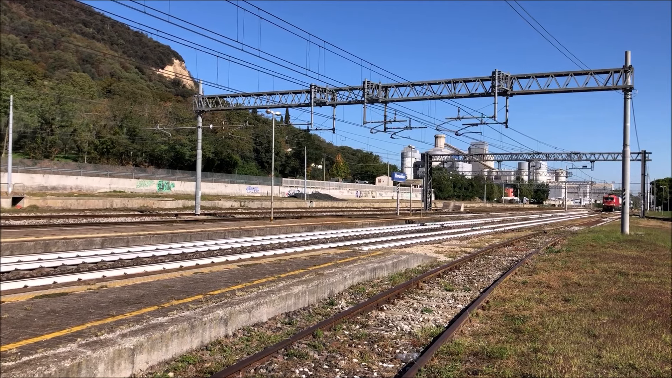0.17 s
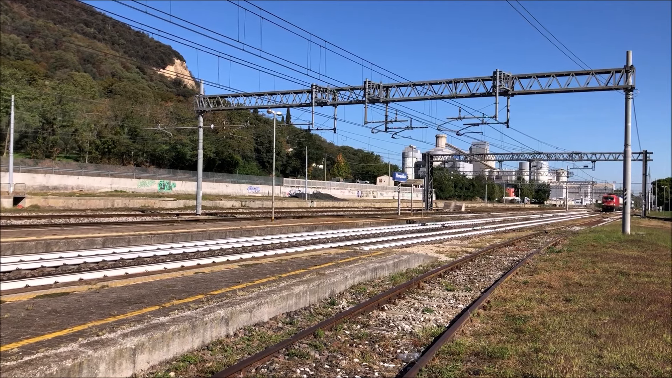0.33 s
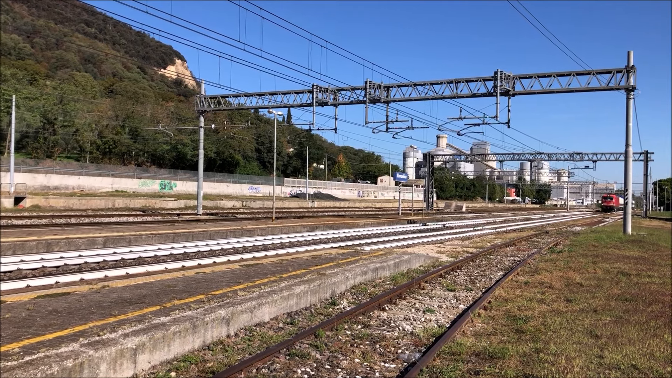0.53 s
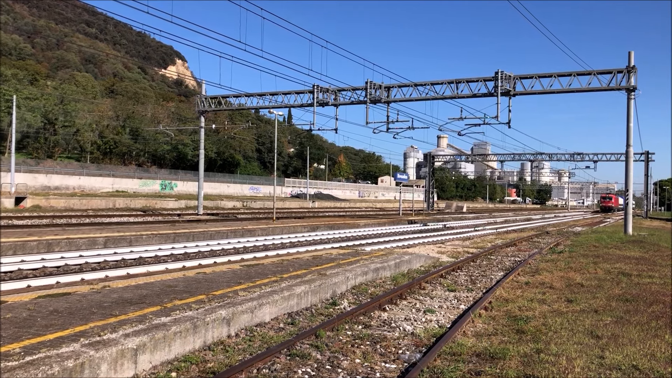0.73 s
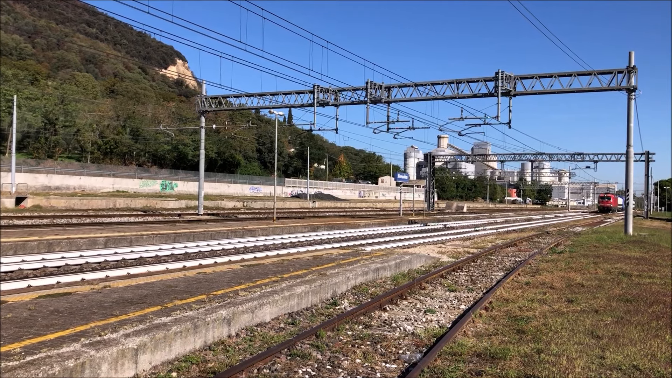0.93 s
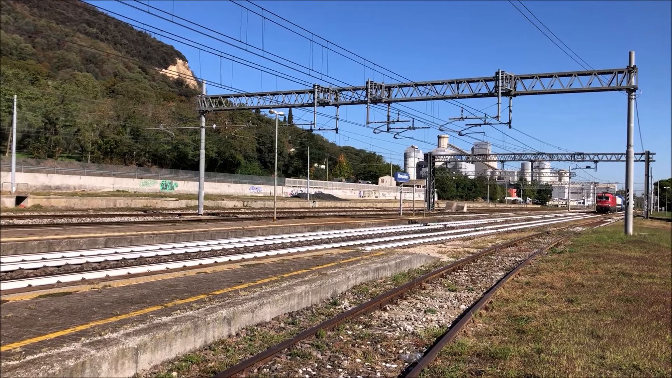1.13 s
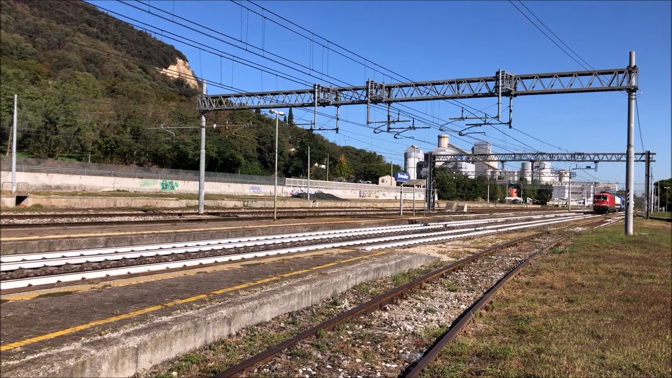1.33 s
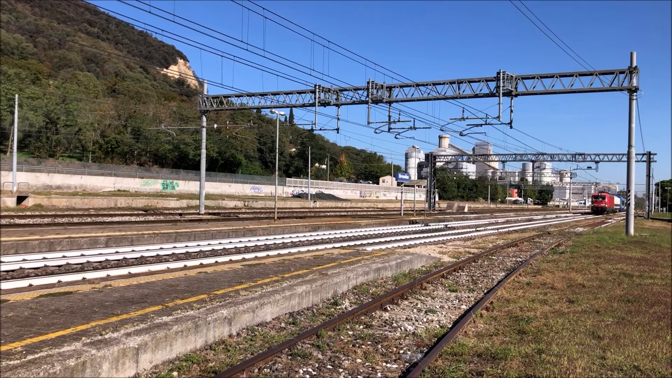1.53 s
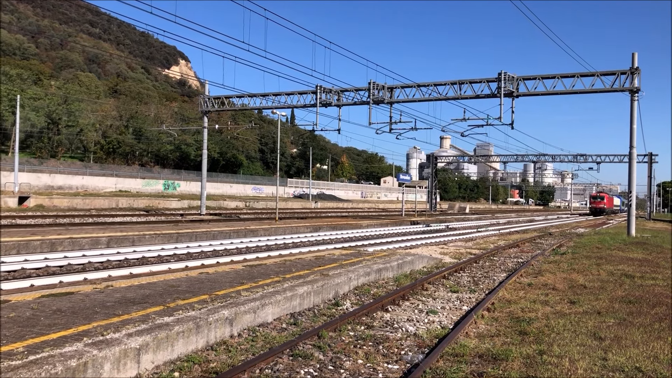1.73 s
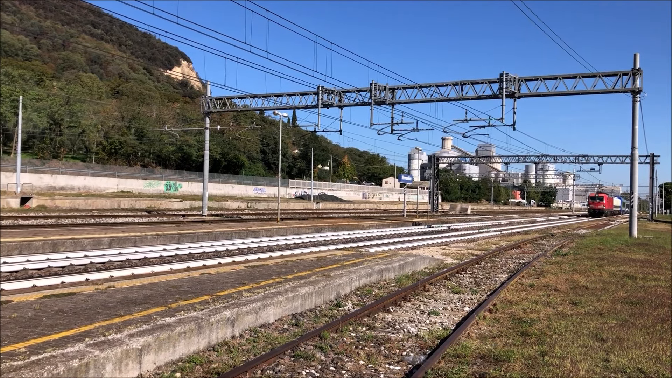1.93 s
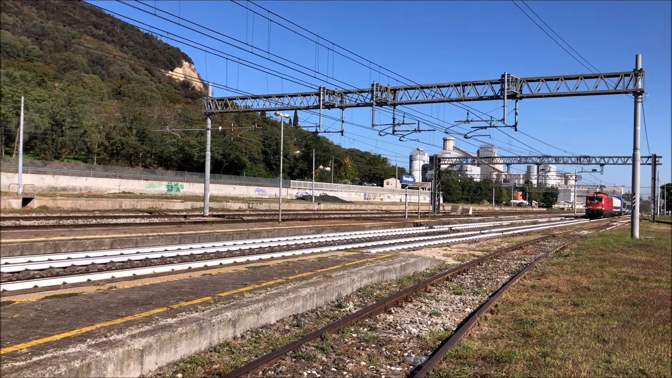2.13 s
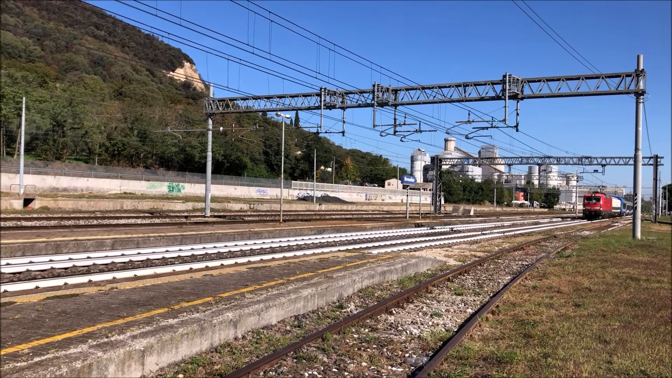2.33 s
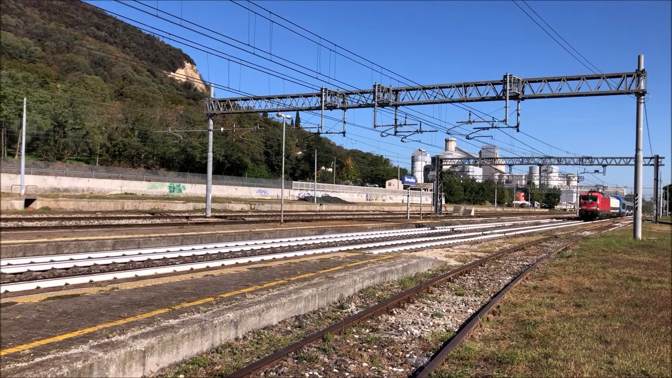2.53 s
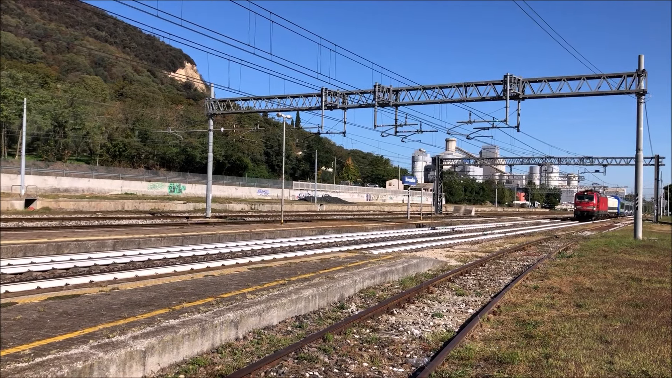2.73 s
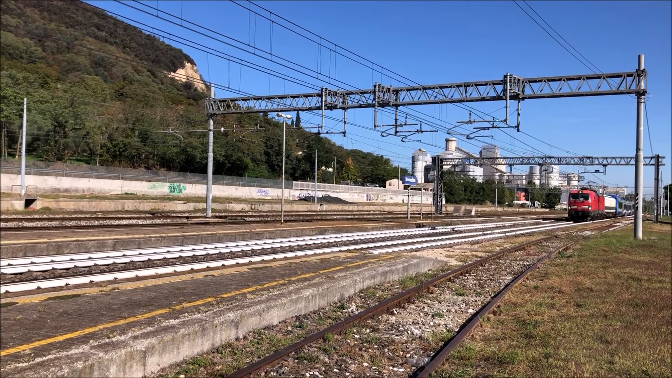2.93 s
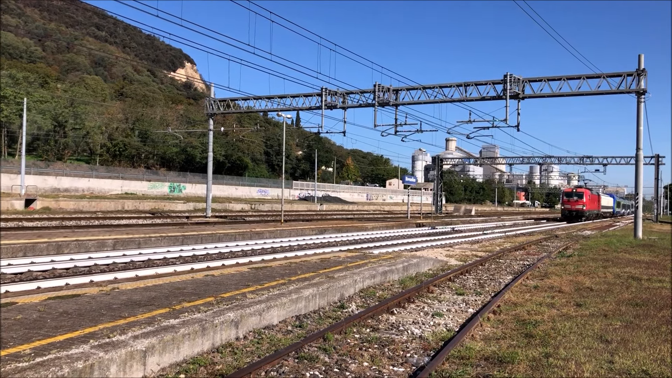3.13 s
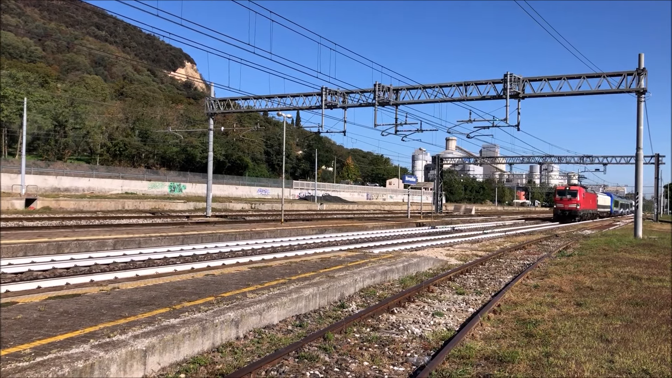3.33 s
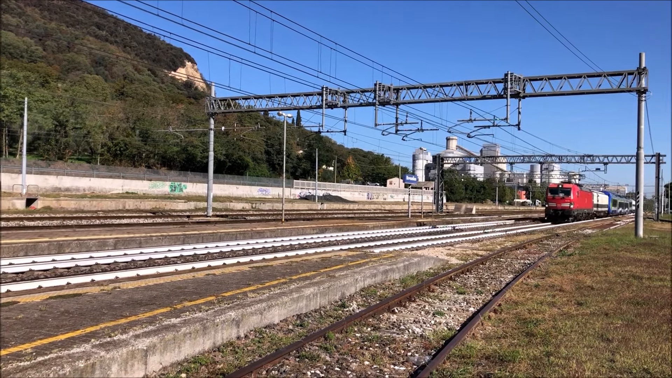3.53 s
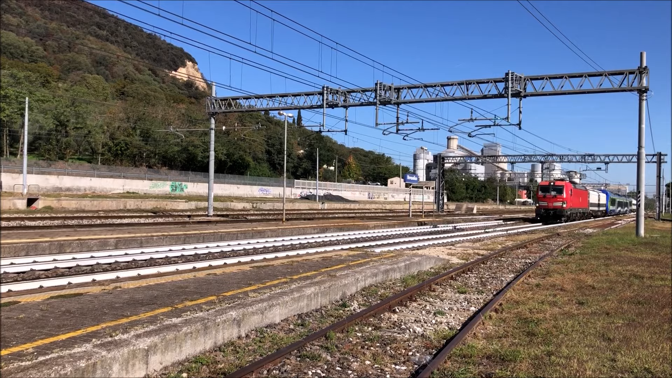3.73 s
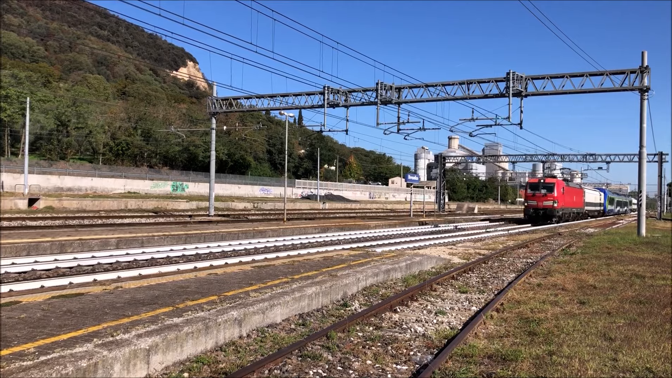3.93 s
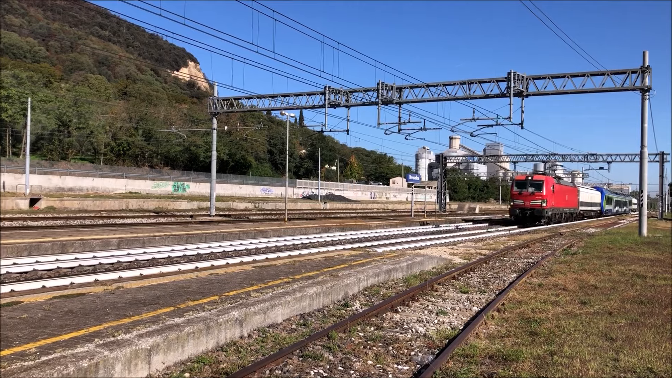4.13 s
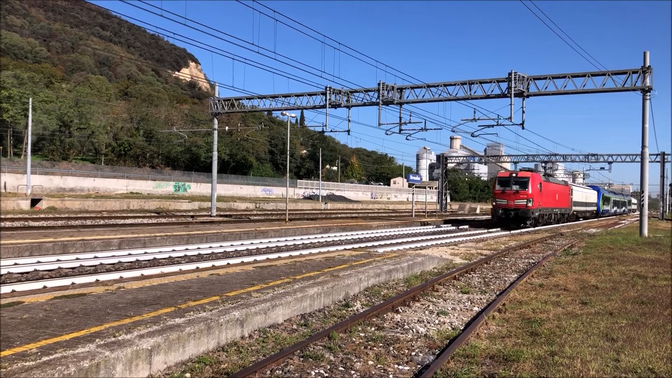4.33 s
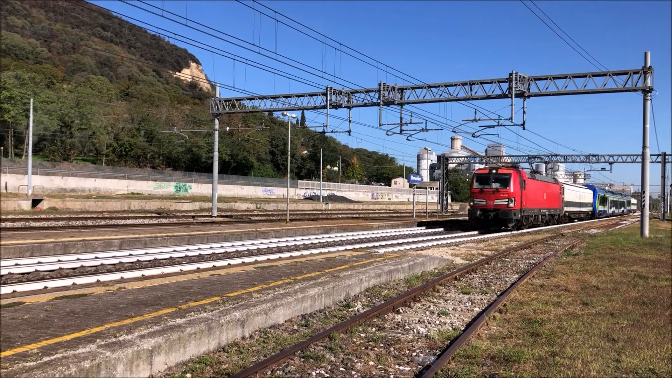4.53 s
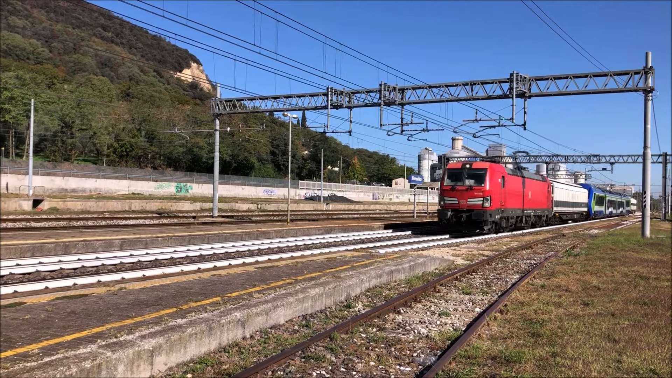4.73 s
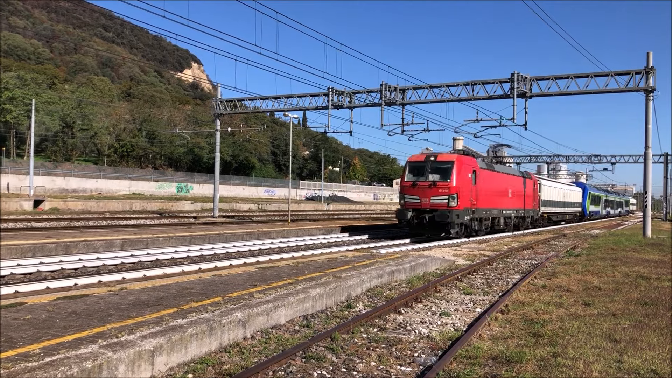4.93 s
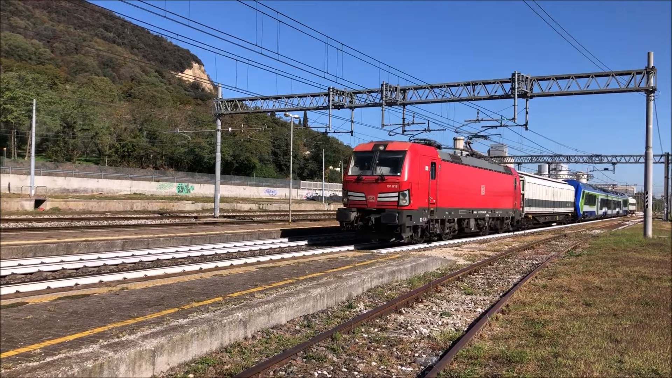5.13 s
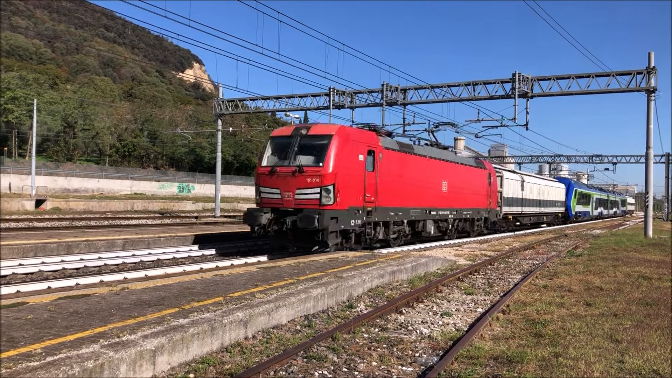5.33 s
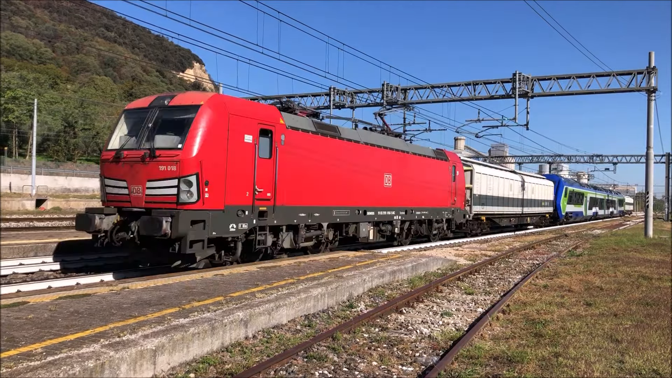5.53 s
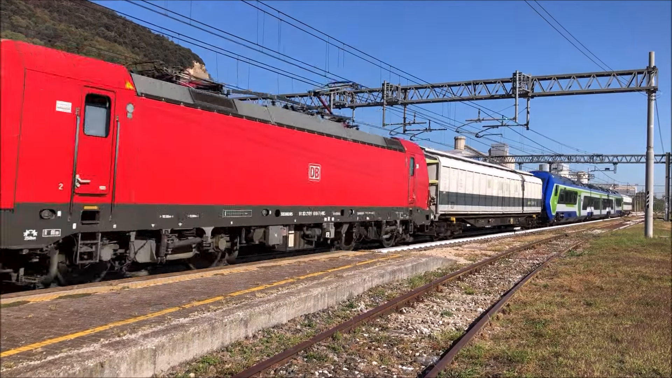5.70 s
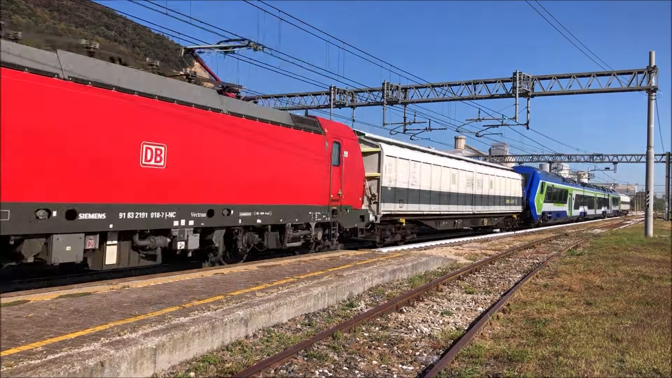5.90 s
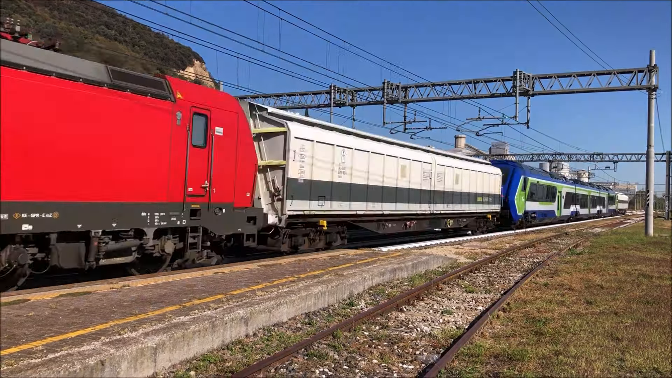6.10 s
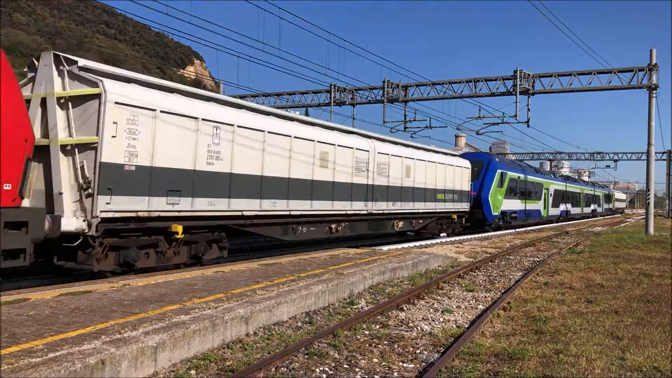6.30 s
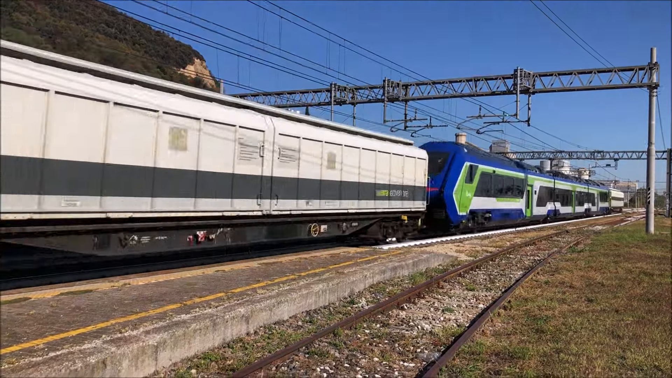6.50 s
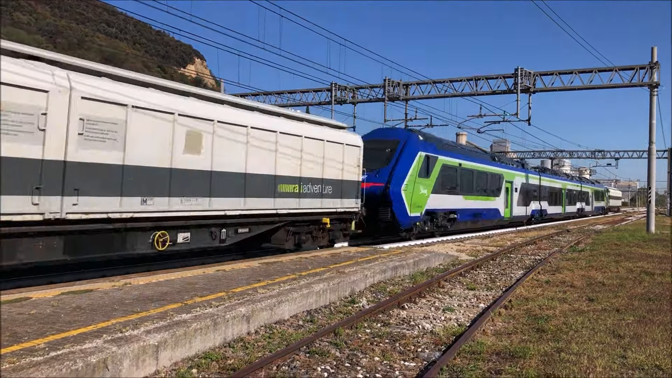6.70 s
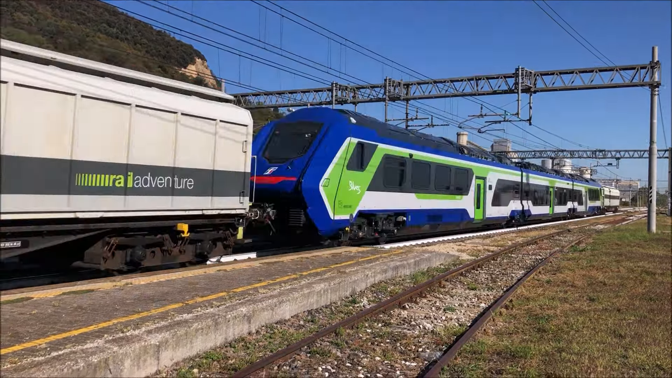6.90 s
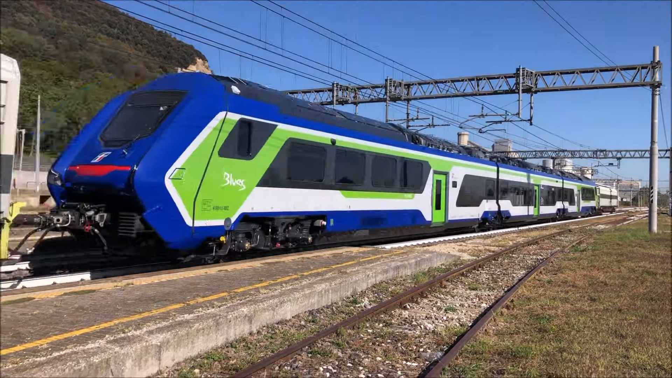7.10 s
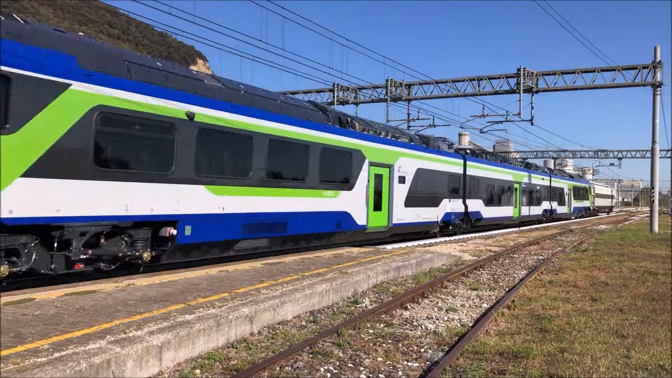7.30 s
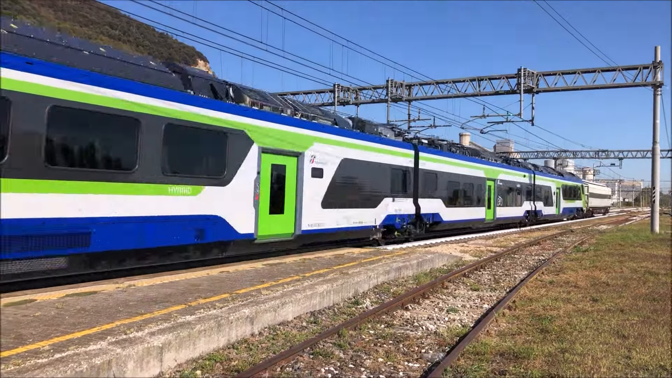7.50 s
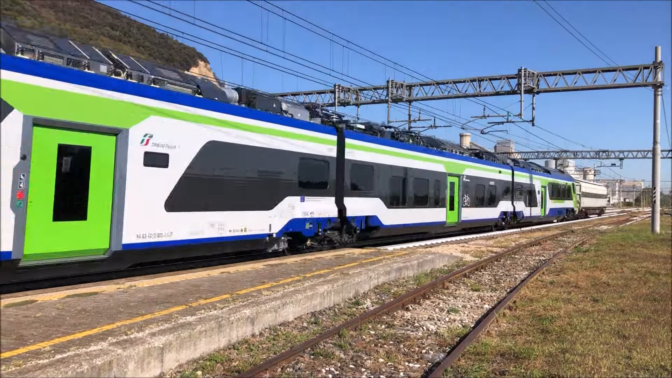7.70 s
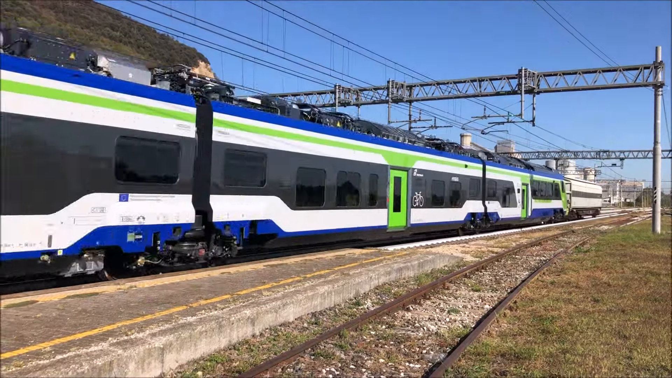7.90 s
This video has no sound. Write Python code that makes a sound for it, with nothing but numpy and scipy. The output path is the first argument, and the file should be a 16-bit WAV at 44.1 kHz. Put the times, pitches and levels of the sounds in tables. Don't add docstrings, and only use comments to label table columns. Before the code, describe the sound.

An open station yard, heard from a phone beside the track. From 0 to 2.7 seconds it is quiet: soft low wind thumps, busiest between 0.9 and 1.9, a faint low hum, a thin high tone and distant rolling noise slowly rising. At 2.7 a short, loud air-horn toot breaks in, then a longer one from 3.0 to 3.4 with two quick raspy wavers, and short toots at 3.6, 4.15, 4.5 and 5.0. All hold one mid-high pitch, sagging slightly as they stop, with slightly lower echoes from walls and hillside and a diffuse tail. From about 4.6 the wheel noise swells and brightens, becoming a close roar near 5.9. Thin falling whines and hissing clanks follow through 6.6. Rail tones drop in pitch, wheel rumble pulses, and sharp metallic clacks cluster around 7.4 to 7.5, with more near 7.7 as the train continues passing to the end.

```python
import sys
import numpy as np
from scipy import signal
from scipy.io import wavfile
from scipy.ndimage import uniform_filter1d, map_coordinates

SR = 44100
rng = np.random.default_rng(int(sys.argv[2]) if len(sys.argv) > 2 else 0)


def generate_wav(signal):
    frames = np.transpose(np.atleast_2d(signal))
    scaled = np.clip(frames, -1, 1) * 32767
    pcm = np.round(scaled).astype(np.int16)
    wavfile.write(sys.argv[1], SR, pcm)


def to_linear_factor(level_db):
    exponent = np.asarray(level_db, float) / 20
    return 10 ** exponent


N = 350595
T = np.arange(N) / SR

# (time [s], peak [dB], pitch [Hz])
WIND_THUMPS = [(0.009, -45, 68), (0.297, -45.5, 59), (0.469, -46.5, 70.0), (0.539, -48.5, 75.6),
               (0.895, -35, 66.2), (0.939, -43, 61.3), (1.017, -35, 81.4), (1.092, -27, 116.6),
               (1.155, -38.5, 94), (1.317, -33.5, 100), (1.359, -40.5, 79), (1.438, -40, 79),
               (1.509, -46, 59), (1.671, -37, 77.8), (1.819, -38, 80), (2.049, -48, 155), (2.317, -41, 72),
               (2.632, -36.5, 68.2), (3.124, -42, 75.4)]
# (time [s], change [dB], half length [s])
WIND_LULLS = [
    (0.149, -4.5, 0.116),
    (.6, -5.5, 0.23),
    (2.948, 3.5, 0.053),
    (4.702, -3.5, 0.234),
    (5.103, -6.5, 0.069),
    (5.548, 4, 0.102),
    (7.079, 4, 0.052),
]
# (start [s], end [s], start pitch [Hz], end pitch [Hz], level [dB])
HUMS = [
    (0, 2.2, 315.4, 318.3, -58),
    (1.65, 2.32, 2330, 2330, -54.5),
]
# (start [s], end [s], start pitch [Hz], end pitch [Hz],
# level [dB])
SIDE_TONES = [(2.82, 2.95, 1760, 1700, -46), (3.02, 3.07, 1690, 1745, -29), (3.09, 3.16, 1680, 1620, -32),
              (3.12, 3.33, 2966, 2966, -29), (3.14, 3.43, 1462, 1466, -18.5), (3.14, 3.42, 2175, 2196, -33),
              (3.14, 3.42, 2930, 2935, -32), (4.24, 4.42, 1790, 1690, -45), (4.55, 4.7, 1754, 1700, -45),
              (5.2, 5.326, 1760, 1710, -46), (3.752, 3.83, 1485, 1455, -23),
              (6.585, 6.635, 8350, 8330, -50), (6.585, 6.63, 13800, 13780, -50),
              (6.385, 6.42, 6000, 5990, -50), (6.19, 6.24, 5430, 5420, -48), (6.15, 6.24, 6330, 6320, -49),
              (2.225, 2.26, 6850, 6850, -66), (7.325, 7.36, 5000, 4990, -47), (7.41, 7.44, 2330, 2330, -33),
              (7.42, 7.445, 950, 950, -33), (7.33, 7.36, 2400, 2350, -38), (7.41, 7.44, 2635, 2630, -31),
              (7.475, 7.51, 5500, 5480, -41), (7.405, 7.44, 3600, 3580, -35), (7.465, 7.5, 3090, 3090, -31),
              (7.47, 7.5, 1823, 1830, -33)]
HUM_WANDER_HZ, SIDE_TONE_WANDER_HZ = 7.7, 3.74

# (time [s], centre [Hz], width [Hz], length [s],
# level [dB])
CLANKS = [(5.846, 6790, 7440, 0.605, -31.5), (5.85, 7100, 4500, 0.024, -39),
          (6.23, 7200, 2500, 0.023, -32.5), (6.634, 6050, 3100, 0.0088, -30), (7.236, 6300, 2500, .01, -38),
          (7.386, 3000, 4000, 0.0017, -35.5), (7.442, 2500, 4000, 0.0015, -25.5),
          (7.472, 3500, 5000, 0.0013, -23.5), (7.478, 2500, 4000, 0.0021, -21.5),
          (7.707, 2500, 4000, 0.0011, -29.5), (6.323, 1500, 2400, 0.00082, -15),
          (6.537, 2500, 4000, .0012, -26), (2.078, 5660, 4970, 0.07, -51),
          (6.333, 1305, 910, 0.0164, -23.5), (6.495, 2020, 1500, .03, -46),
          (6.803, 3430, 4910, 0.0444, -25.5), (6.944, 6770, 3480, 0.0137, -30),
          (7.19, 6500, 4000, 0.013, -30.5), (7.221, 6040, 2000, 0.0133, -34),
          (7.442, 2960, 5970, 0.087, -24), (7.46, 5000, 5960, 0.0152, -25), (7.43, 2930, 5030, 0.00313, -8),
          (7.464, 3000, 5000, 0.00206, -24), (7.485, 2970, 5030, 0.0025, -32),
          (7.583, 2013, 2960, 0.00119, -24.5), (7.692, 1170, 1500, 0.033, -24),
          (7.835, 12000, 4000, 0.0263, -35)]
# (start [s], end [s], start pitch [Hz], level [dB])
WHINES = [(5.865, 6.15, 8040, -46.5), (5.97, 6.265, 5520, -45), (6.13, 6.26, 6420, -45),
          (5.93, 6.2, 14800, -55), (6.06, 6.18, 13150, -54), (6.214, 6.387, 10600, -54),
          (6.28, 6.38, 6640, -49), (6.42, 6.6, 14200, -53), (6.08, 6.2, 3900, -44), (6.4, 6.52, 13550, -55),
          (7.4, 7.55, 15100, -54)]
WHINE_FALL_PER_S, WHINE_WANDER = 0.11, 0.004

# (frequency [Hz], density [dB per Hz])
FAR_COLOUR = [(13, -42.5), (22, 2.5), (58, 21.5), (80, 22), (242, -22.5), (524, -24.5), (585, -21.5),
              (792, -24.5), (1070, -24), (1230, -22), (1410, -23.5), (1970, -26.5), (2390, -32.5),
              (16000, -76)]
NEAR_COLOUR = [(13, -50), (22, -71.5), (66, 10.5), (140, -4.5), (229, -1), (618, -12.5), (1070, -20),
               (1270, -17.5), (1620, -21.5), (1860, -23), (2820, -20.5), (6440, -27.5), (16000, -37.5)]
# (pitch while nearing [Hz], width [Hz], level [dB])
RAIL_MODES = [
    (742, 11, 2),
    (1426.9, 56.8, 10),
    (2106, 57, 9.5),
    (2330, 29, 10.5),
]
# (time [s], pitch ratio)
DOPPLER = [(0, 1), (5.8, 0.951), (6.3, 0.942), (6.7, 0.883), (7.2, 0.804), (7.95, 0.781)]
LAYER_EDGES_HZ = [40, 150, 500, 2500, 15500]
# (level alongside [dB], arrival [s], track distance over speed [s], growth alongside [dB/s],
# wind or yard level [dB])
ROLLING = [
    (-30.5, 5.933, 0.123, 5.5, -50.5),
    (-28, 6.059, 0.168, 3.5, -83),
    (-21.5, 6.022, 0.1074, -1, -89),
    (-35.5, 6.132, 0.09, 1.95, -68.5),
]
YARD_RISE_DB_PER_S = [0.68, 2, 2, 3.486]
AIR_LOSS_DB_PER_S = [.1, 0.076, 0.89, 0.76]
# (time [s], rumble and body [dB], rails and hiss [dB], half length [s])
BOGIES = [(6.204, 3.5, 3.5, 0.103), (6.514, 4.5, 3.5, 0.039), (6.621, 5, 4.5, 0.0437),
          (6.818, 6.5, 5, 0.082), (6.951, -1, -3.5, 0.03), (7.265, 3, 3, 0.516), (7.45, 6, 10, 0.058),
          (7.567, 2, -0.5, 0.023), (7.677, 9, -1, 0.0647), (7.793, 6, 0.5, 0.034),
          (7.902, -0.5, -2.5, 0.037)]
BOGIE_SHARES = [0.407, 1, 0.525, 0.858]
# (time [s], gain [dB])
PHONE_GAIN = [(2.68, 10.5), (2.8, 5), (3.5, -3), (4.4, -1), (4.85, 2), (5.05, -4), (5.45, -5.5),
              (5.8, -3.5), (6.05, -7)]

# (opens [s], shuts [s], level [dB], attack [dB], upper partials [dB])
TOOTS = [
    (2.687, 2.862, -1.5, 1.5, -28),
    (3.003, 3.418, -1, 2, -32),
    (3.611, 3.748, -2, -4, -32),
    (4.149, 4.295, -0.5, -3.5, -27.5),
    (4.474, 4.607, -1, 1.5, -28.5),
    (5.001, 5.125, -1, 2.5, -25.5),
]
# (multiple of pitch, level [dB])
PARTIALS = [(1, 0), (2, -6), (3, -18), (4, -19.5), (5, -18), (6, -26), (7, -25.5), (8, -28), (9, -27.5),
            (10, -29.5), (11, -32), (12, -34.5), (13, -36), (14, -35.5), (15, -37), (16, -38.5),
            (17, -50.5), (18, -46), (19, -48), (20, -51.5), (21, -50)]
# (3rd [dB], 4th [dB], 5th [dB])
BRASS_OPEN = [(-25, -31, -18.5), (-33, -31.5, -28), (-33, -36.5, -39.5), (-42.5, -28.5, -34),
              (-23.5, -22, -26.5), (-21, -20, -16)]
BRASS_MID = [(-30, -28, -27.5), (-29, -26.5, -31.5), (-28.5, -30.5, -31.5), (-33, -37, -27.5),
             (-25, -34, -22.5), (-20.5, -28, -18)]
BRASS_SHUT = [(-24.5, -26.5, -31), (-29.5, -33, -39), (-26, -28.5, -34), (-24, -28.5, -26),
              (-24, -36, -26.5), (-20, -25.5, -25)]
AIR_TILT_DB = [-0.14, -0.032, 0.49, 0.618, 0.777, 0.797]
# (time [s], pitch loss [Hz], half length [s])
PRESSURE_DIPS = [
    (3.131, 23.67, 0.01072),
    (3.278, 20.14, 0.01134),
]
RASP_SHARES = [0.48, 1, .2]
# (time [s], lag [ms])
BOUNCE_LAG = [(2.69, 0.498), (2.72, 0.68), (2.79, 0.76), (2.85, 1), (3.01, 0.497), (3.12, 0.363),
              (3.15, 0.501), (3.42, 0.476), (3.62, 0.456), (3.74, 0.482), (4.16, 0.407), (4.23, 0.273),
              (4.3, 0.261), (4.48, 0.301), (4.61, 0.2446), (5.0, 0.434), (5.12, 0.481)]
RELEASE_STEP_DB = [-11.5, -7, -3]
LINGERS_S = [0.0386, 0.0234, 0.0299, 0.0291, 0.0299, 0.0309]
# (toot index, arrival [s], pitch ratio)
WALLS = [(0, 2.84, .975), (0, 2.84, .853), (0, 2.77, .93), (1, 3.155, .968), (1, 3.1, .91), (2, 3.73, .962),
         (2, 3.83, .955), (3, 4.275, .853), (3, 4.31, .958), (3, 4.2, .92), (4, 4.645, .853),
         (4, 4.672, .953), (5, 5.215, .945), (5, 5.008, .955), (5, 5.27, .853), (2, 3.655, .872),
         (0, 2.75, .986), (1, 3.11, .987)]
# (1st partial [dB], 2nd partial [dB], higher [dB])
ECHOES = [(-22, -19, -27), (-42, -44, -46), (-38, -36, -39), (-29, -27, -40), (-42, -39, -44),
          (-27, -26, -34), (-37, -36, -36), (-24, -30, -42), (-33, -31, -32), (-40, -34, -48),
          (-33, -35, -40), (-35, -33, -34), (-47, -38, -34), (-30, -21, -36), (-46, -45, -52),
          (-31, -32, -44), (-40, -36, -30), (-38, -35, -31)]
# (3rd [dB], 4th [dB], 5th [dB])
WALL_BRASS_DB = [
    [-2, -5, -7],
    [-4, -5, -9],
    [-3, -11, -13],
    [1, -10, -12],
    [2, -10, -14],
    [3, -10, -12],
]
HILL_BRASS_DB = [-3, -2, -1]

HORN_HZ, KICK_HZ, KICK_S = 746.89, 26.01, 0.0142
SAG_HZ, SAG_S, REBOUND_HZ, REBOUND_S = 32.32, 0.00317, 20.2, 0.021
FIRST_DB, SECOND_DB, BOUNCE_SHARE = -8, -7.5, 0.547
RASP_DB, RASP_S, SHUT_RASP_DB = 11, 0.0055, 6.5
ATTACK_S, RELEASE_DB_PER_S, RELEASE_LEAD_S, RELEASE_S = 0.025, 391.5, 0.0072, 0.0805
FALL_DB_PER_S = 1800
HIGH_BREATH_DB, LOW_BREATH_DB = -20, -22.5
DRYING_DB_PER_S = -2.5
YARD_T60_S, YARD_DB = 2.46, -20

# (time [s], above [Hz], level [dB])
STARVED = [(.813, 3500, -20), (1.09, 2500, -30), (1.368, 3500, -20), (1.496, 3500, -15), (2.242, 3500, -15),
           (2.37, 3000, -18), (3.074, 4000, -14), (3.544, 2570, -18), (3.714, 3500, -12),
           (3.757, 3920, -16), (3.992, 1490, -6), (4.781, 2970, -25), (4.909, 1200, -20), (5.4, 1480, -7),
           (5.762, 2930, -17), (6.21, 2600, -10), (6.402, 2430, -11), (6.594, 2220, -45),
           (6.616, 2214, -45), (6.765, 1540, -13), (7.277, 1800, -18), (7.341, 1100, -25),
           (7.426, 950, -23), (7.49, 900, -8), (7.597, 1230, -20), (7.682, 1500, -22)]
FRAME_S, FRAME_START, KEPT_OVER = 1024 / 48000, 103, 2.1


def walk(size, per_s):
    knots = uniform_filter1d(np.repeat(rng.standard_normal(int(size * per_s / SR) + 2), 4), 4)
    return 1.562 * np.interp(np.arange(size) * 4 * per_s / SR, np.arange(len(knots)), knots)


def band(x, low_hz, high_hz):
    edges_hz = [max(low_hz, 20), min(high_hz, .45 * SR)]
    return signal.sosfilt(signal.butter(2, edges_hz, "band", fs=SR, output="sos"), x)


def add(out, start_s, x):
    i = int(start_s * SR)
    out[i:i + len(x)] += x[:N - i]


def bumps(t, rows):
    return sum(height * np.exp(-((t - s) / half_s) ** 2) for s, height, half_s in rows)


def tone(start, end, start_hz, end_hz, db, wander_hz):
    n = int((end - start) * SR)
    hz = np.linspace(start_hz, end_hz, n) + wander_hz * walk(n, 30 + 5 * wander_hz)
    level = to_linear_factor(db + 1.5 + 3.0 * walk(n, 20 + wander_hz))
    return level * np.sin(2 * np.pi * np.cumsum(hz) / SR) * np.hanning(n) ** 0.25


def wind_thumps():
    out = np.zeros(N)
    for s, db, hz in WIND_THUMPS:
        t = T[:int(3.2 / hz * SR)]
        add(out, s, to_linear_factor(db + 7.5) * np.sin(2 * np.pi * hz * t) * np.hanning(len(t)))
    return out


def hums_and_side_tones():
    out = np.zeros(N)
    for rows, wander_hz in ((SIDE_TONES, SIDE_TONE_WANDER_HZ), (HUMS, HUM_WANDER_HZ)):
        for row in rows:
            add(out, row[0], tone(*row, wander_hz))
    return out


def clanks():
    out = np.zeros(N)
    for s, hz, width_hz, length_s, db in CLANKS:
        t = T[:int(2.5 * length_s * SR) + 200]
        noise = band(rng.standard_normal(len(t)), hz - width_hz / 2, hz + width_hz / 2)
        shape = (t / length_s) ** .5 * np.exp(-(t / length_s) ** 2)
        add(out, s, to_linear_factor(db) * noise / noise.std() * shape)
    return out


def whines():
    out = np.zeros(N)
    for start, end, hz, db in WHINES:
        end_hz = hz * (1 - WHINE_FALL_PER_S * (end - start))
        add(out, start, tone(start, end, hz, end_hz, db, WHINE_WANDER * hz))
    return out


def rolling_levels(t):
    levels = []
    for k, (db, arrives, reach_s, growth_db, yard_db) in enumerate(ROLLING):
        since = t - arrives
        db = db - 20 * np.log10(np.hypot(1, np.minimum(since, 0) / reach_s))
        db = db + growth_db * np.maximum(since, 0)
        db = db + AIR_LOSS_DB_PER_S[k] * np.minimum(since + 3, 0)
        db = db + BOGIE_SHARES[k] * bumps(t, [(row[0], row[1 + k // 2], row[3]) for row in BOGIES])
        power = to_linear_factor(2 * db) + to_linear_factor(2 * (yard_db + YARD_RISE_DB_PER_S[k] * t))
        if k == 0:
            power = power * to_linear_factor(2 * bumps(t, WIND_LULLS))
        levels.append(10 * np.log10(power) + np.interp(t, *np.transpose(PHONE_GAIN)))
    return levels


def rolling_noise():
    hz, t, z = signal.stft(rng.standard_normal(N), SR, nperseg=1024, noverlap=768)
    hz = np.maximum(hz, 10)[:, None]
    log_hz = np.log(hz)
    far, near = (np.interp(log_hz, np.log(c[:, 0]), c[:, 1]) for c in map(np.array, (FAR_COLOUR, NEAR_COLOUR)))
    close = np.clip((t - 4.6) / 1.16, 0, 1)
    db = far + close * (near - far)
    doppler = np.interp(t, *np.transpose(DOPPLER))
    for mode_hz, width_hz, mode_db in RAIL_MODES:
        db = db + mode_db / (1 + (2 * (hz - mode_hz * doppler) / width_hz) ** 2)

    lift = []
    for low, high, level in zip(LAYER_EDGES_HZ, LAYER_EDGES_HZ[1:], rolling_levels(t)):
        inside = to_linear_factor(2 * db)[(hz[:, 0] >= low) & (hz[:, 0] < high)].sum(0) / len(hz)
        lift.append(level - 10 * np.log10(inside))
    frame = np.arange(len(t))
    layer = np.interp(log_hz[:, 0], np.log([120, 190, 420, 600, 2300, 2700]), [0, 1, 1, 2, 2, 3])
    db = db + map_coordinates(np.array(lift), np.meshgrid(layer, frame, indexing="ij"), order=1)

    samples = (t * SR).astype(int).clip(0, N - 1)
    flicker = np.array([walk(N, 12)[samples] for _ in range(12)])
    octave = np.log2(hz[:, 0] / 10).clip(0, 11)
    patches = map_coordinates(flicker, np.meshgrid(octave, frame, indexing="ij"), order=1)
    db = db + patches * np.interp(log_hz, np.log([60, 300, 3000]), [2.5, 1.5, .8])

    struck = (rng.random(db.shape) < .004) * rng.exponential(size=db.shape) * (hz > 500)
    rings = uniform_filter1d(uniform_filter1d(struck, size=7, axis=1), size=2, axis=0)
    db = db + 4.5 * close * np.minimum(rings * 14, 1.1)
    return signal.istft(z * to_linear_factor(db), SR, nperseg=1024, noverlap=768)[1][:N]


def horn_pitch(k, t):
    since_shut = t - TOOTS[k][1]
    hz = HORN_HZ + KICK_HZ * np.exp(-(t - t[0]) / KICK_S)
    hz = hz - SAG_HZ * (1 + np.tanh(since_shut / SAG_S / 2)) / 2
    hz = hz + REBOUND_HZ * np.clip(since_shut / REBOUND_S - 1, 0, 1)
    return hz - bumps(t, PRESSURE_DIPS)


def toot_levels(k, t):
    opens, shuts, db, attack_db, upper_db = TOOTS[k]
    rise_db = attack_db * np.clip(1 - (t - opens) / ATTACK_S, 0, 1)
    late_db = -FALL_DB_PER_S * np.maximum(t - shuts - LINGERS_S[k], 0)
    release_db = -RELEASE_DB_PER_S * np.maximum(t - shuts + RELEASE_LEAD_S, 0)
    fall = [late_db + np.maximum(release_db, step_db) for step_db in RELEASE_STEP_DB]

    turn = 2j * np.pi * HORN_HZ * np.interp(t, *np.transpose(BOUNCE_LAG)) / 1000
    first, second = (20 * np.log10(abs(1 + BOUNCE_SHARE * np.exp(n * turn))) for n in (1, 2))

    rasp_db = bumps(t, [(s, RASP_DB, RASP_S) for s, *_ in PRESSURE_DIPS])
    flare_db = bumps(t, [(shuts, SHUT_RASP_DB, 2 * RASP_S)])
    brass = []
    for share, *levels_db in zip(RASP_SHARES, BRASS_OPEN[k], BRASS_MID[k], BRASS_SHUT[k]):
        held_db = np.interp(t, [opens, (opens + shuts) / 2, shuts], levels_db)
        brass.append(held_db + share * rasp_db + fall[2])
    return [FIRST_DB + db + first + rise_db + fall[0], SECOND_DB + db + second + rise_db + fall[1],
            brass, upper_db + flare_db + rise_db + fall[2]]


def stack(hz, first, second, brass, upper, tilt_db, scatter, fade_db):
    n = len(hz)
    phase = 2 * np.pi * np.cumsum(hz * (1 + 0.002 * walk(n, 70))) / SR
    shape = np.array(PARTIALS)[:, 1]
    groups = [first, second, *brass] + [upper] * (len(shape) - 5)
    share_db = np.r_[np.zeros(5), shape[5:] - 10 * np.log10(sum(to_linear_factor(2 * shape[5:])))]
    out = 0
    for k, db in enumerate(groups):
        loose = min(scatter * min(k + 1, 10) ** 1.4, .5)
        per_s = 45 + 7 * k
        wave = (k + 1) * phase + (6 if k < 5 else .8) * rng.random()
        even = np.sqrt(1 - loose) + np.sqrt(loose / 2) * walk(n, per_s)
        odd = np.sqrt(loose / 2) * walk(n, per_s)
        slow_db = fade_db * min(k / 2, 1) * walk(n, 15.84)
        level = to_linear_factor(db + share_db[k] + max(k - 5, 0) * tilt_db + slow_db)
        out = out + level * (even * np.sin(wave) + odd * np.cos(wave))
    return np.sqrt(2) * out


def direct_toot(k, wet_db):
    opens, shuts = TOOTS[k][:2]
    t = np.arange(opens, shuts + RELEASE_S, 1 / SR)
    levels = toot_levels(k, t)
    high_db = levels[3] + HIGH_BREATH_DB + wet_db / 2 + 2 * walk(len(t), 40)
    breath = band(rng.standard_normal(len(t)), 3500, 10000) * to_linear_factor(high_db)
    breath = breath + band(rng.standard_normal(len(t)), 690, 3300) * to_linear_factor(levels[1] + LOW_BREATH_DB + wet_db)
    edge = np.minimum(np.minimum(t - opens, (t[-1] - t) / 6) / 0.00346, 1)
    return edge * (stack(horn_pitch(k, t), *levels, AIR_TILT_DB[k], scatter=.009, fade_db=1.6) + breath)


def add_haze(haze, opens, direct, wet_db):
    for lag, slow, size in rng.random((40, 3)):
        place = np.arange(0, len(direct), 1 - .15 * slow ** 1.3)
        copy = np.interp(place, np.arange(len(direct)), direct) * np.minimum(place / 600, 1)
        add(haze, opens + .015 + 0.41 * lag ** 1.5, copy * to_linear_factor(wet_db - 28.5 - 4.35 * lag - 31.25 * size))


def add_wall_echoes(out):
    for (k, arrival_s, ratio), (first, second, higher) in zip(WALLS, ECHOES):
        t = np.arange(TOOTS[k][0], TOOTS[k][1] + .042, ratio / SR)
        edge = np.minimum(np.minimum((t - t[0]) / 0.0086, (t[-1] - t) / 0.039), 1)
        brass = higher + np.array(WALL_BRASS_DB[k] if ratio > .86 else HILL_BRASS_DB)
        echo = stack(ratio * horn_pitch(k, t), first, second, brass, higher - 9.5,
                     tilt_db=-1.6, scatter=.065, fade_db=1.2)
        add(out, arrival_s, edge * echo)


def reverb(x, impulse):
    return signal.fftconvolve(x, impulse / np.sqrt(sum(impulse ** 2)))[:N]


def horn():
    out, haze = np.zeros(N), np.zeros(N)
    for k, (opens, *_) in enumerate(TOOTS):
        wet_db = DRYING_DB_PER_S * (opens - TOOTS[0][0])
        direct = direct_toot(k, wet_db)
        add(out, opens, direct)
        add_haze(haze, opens, direct, wet_db)
    add_wall_echoes(out)
    haze = haze + to_linear_factor(3.5) * band(haze, 1830, 9930)

    t = T[:int(1.5 * SR)]
    yard = band(rng.standard_normal(len(t)) * to_linear_factor(-60 * t / YARD_T60_S) * np.minimum(t / 0.05, 1), 200, 3300)
    t = T[:int(.3 * SR)]
    platform = band(rng.standard_normal(len(t)) * to_linear_factor(-60 * t / 0.1244), 3390, 14180)
    return (out + haze + to_linear_factor(-10.0) * reverb(out, platform)
            + to_linear_factor(YARD_DB) * reverb(0.189 * out + 4 * haze, yard))


def scene():
    small = wind_thumps() + hums_and_side_tones() + clanks() + whines()
    return (small + rolling_noise() + horn())[None]


def starve(x):
    hop = round(FRAME_S * SR)
    n, line = np.arange(2 * hop), np.arange(hop)[:, None] + .5
    window = np.sin(np.pi * (n + .5) / 2 / hop)
    basis = window * np.cos(np.pi / hop * (n + .5 + hop / 2) * line) * np.sqrt(2 / hop)
    hz, out = line[:, 0] * SR / 2 / hop, x.copy()
    for s, above_hz, db in STARVED:
        i = FRAME_START + round(round(s / FRAME_S) * FRAME_S * SR) - hop
        lines = basis @ x[i:i + 2 * hop]
        local_rms = np.sqrt(uniform_filter1d(lines ** 2, size=41))
        weak = abs(lines) < KEPT_OVER * (hz / above_hz) ** .3 * local_rms
        treble = np.clip((hz - above_hz) / 300 + .5, 0, 1)
        out[i:i + 2 * hop] -= (lines * weak * treble * (1 - to_linear_factor(db))) @ basis
    return out


def roll_off(x):
    return signal.sosfilt(signal.butter(12, 16550, fs=SR, output="sos"), x)


def record(dry):
    x = dry[0] / (1 + dry[0] ** 4) ** .25
    x = signal.sosfilt(signal.butter(3, 48, "high", fs=SR, output="sos"), x)
    x = signal.sosfilt(signal.ellip(12, .2, 80, 15780, fs=SR, output="sos"), x)
    mix = starve(x)[None]
    return roll_off(mix)


dry = scene()
out = record(dry)
generate_wav(out)
```